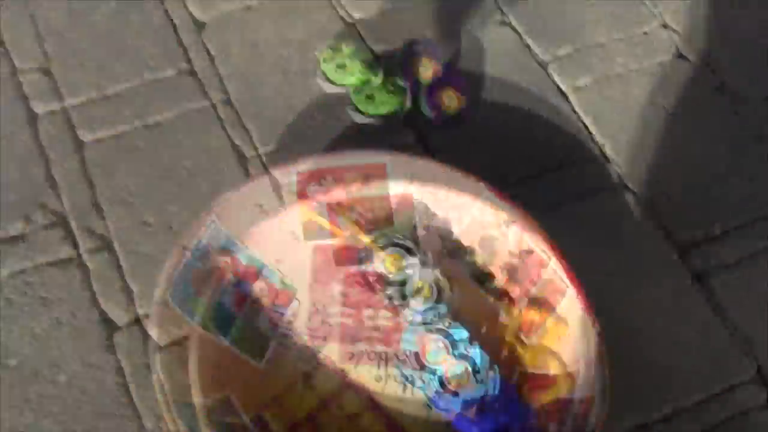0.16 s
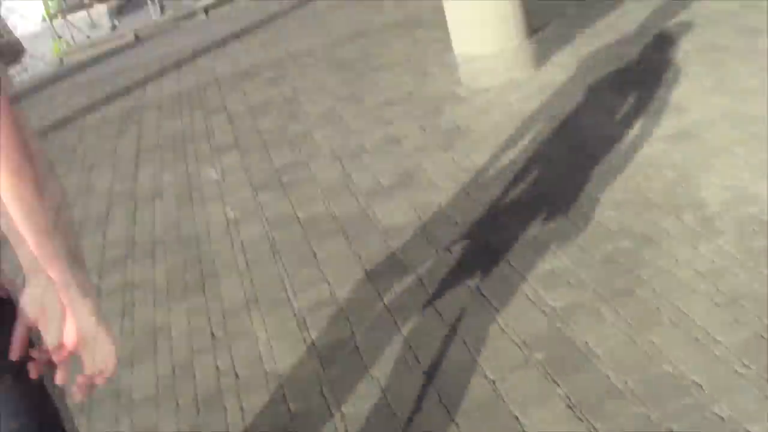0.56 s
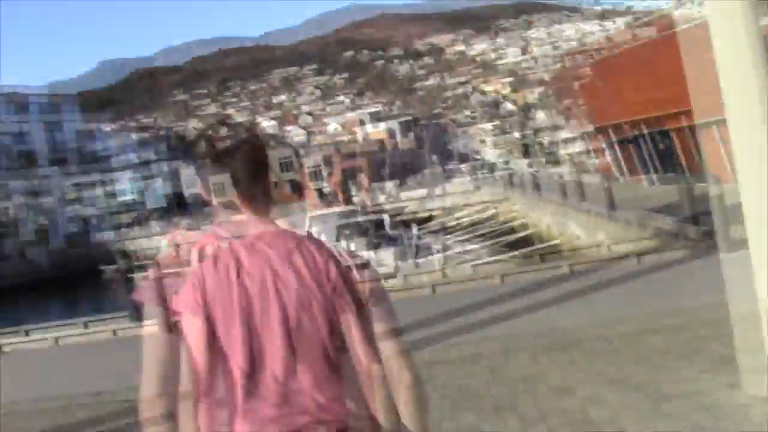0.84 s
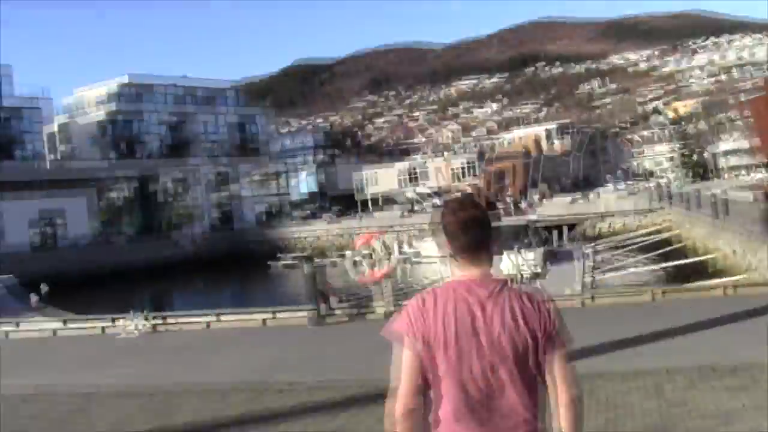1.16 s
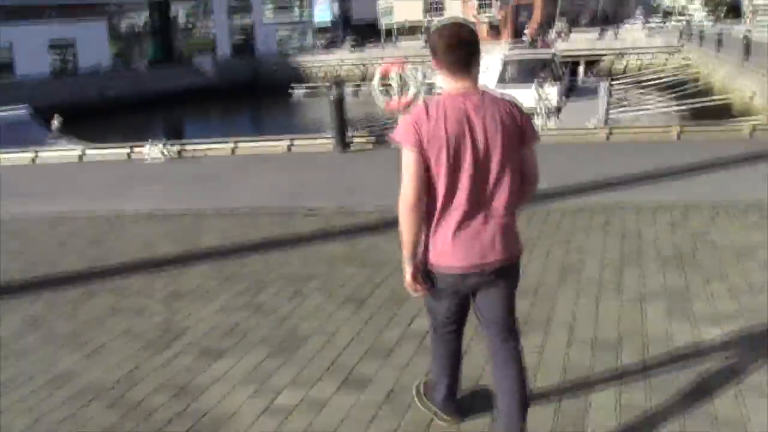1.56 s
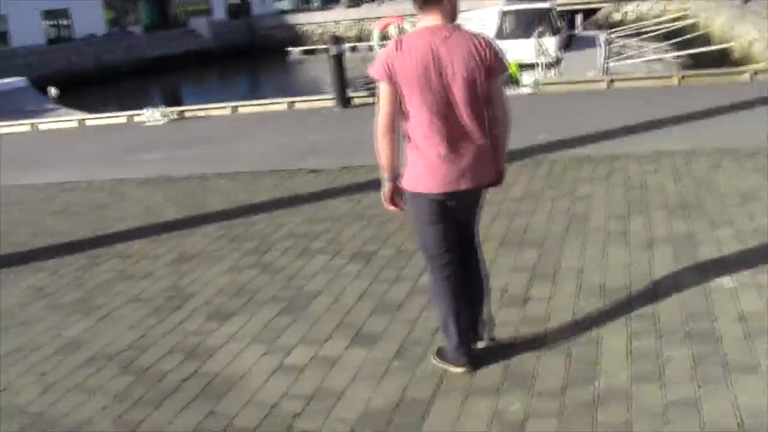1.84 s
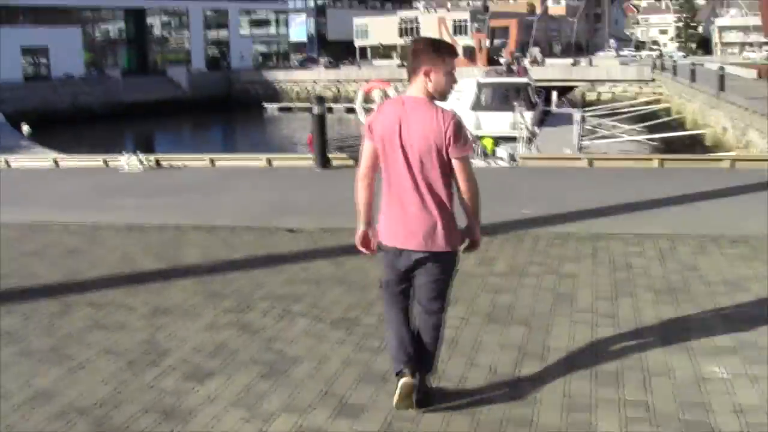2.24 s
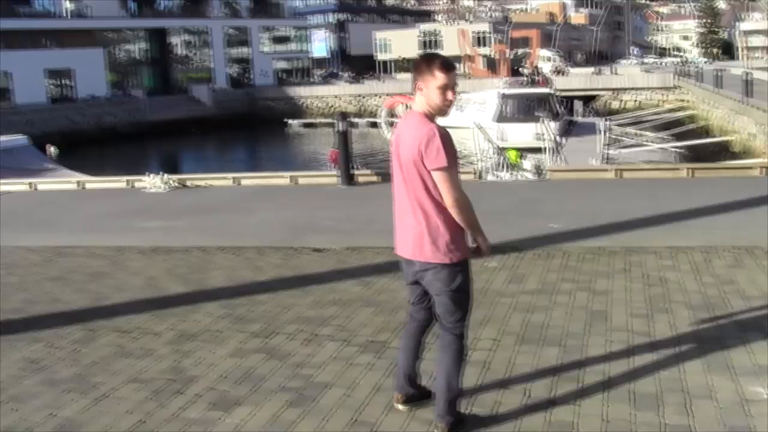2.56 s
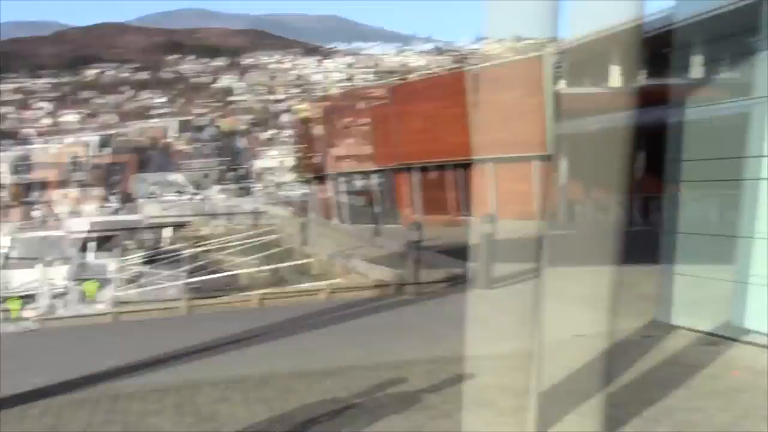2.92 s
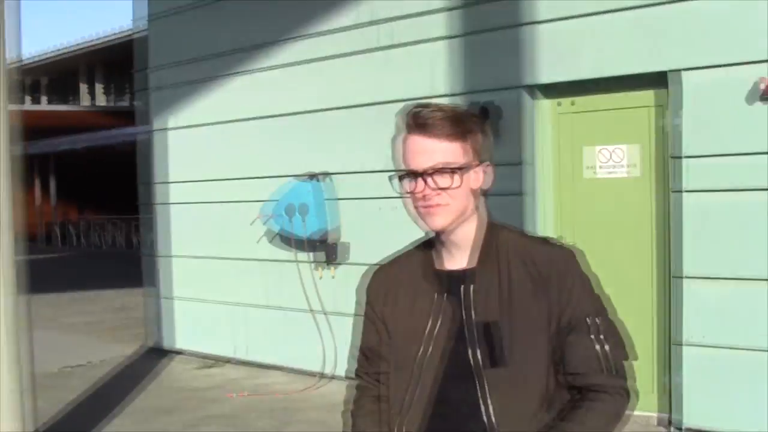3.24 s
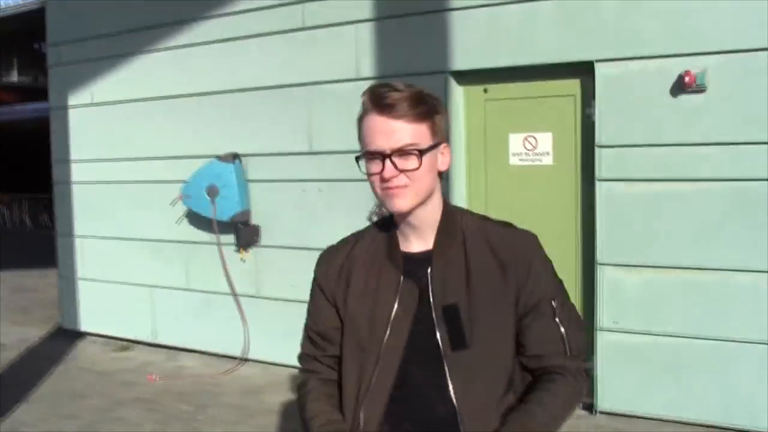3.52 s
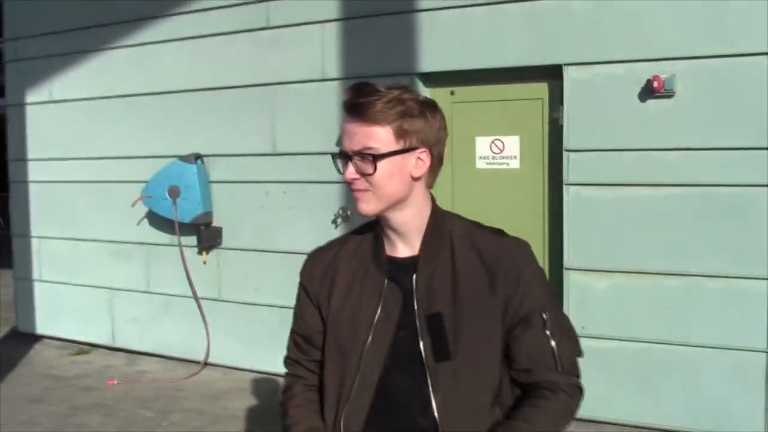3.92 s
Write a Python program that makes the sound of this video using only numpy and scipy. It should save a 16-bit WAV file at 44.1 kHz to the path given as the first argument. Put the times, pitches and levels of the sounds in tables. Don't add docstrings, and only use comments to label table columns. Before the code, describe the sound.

Bright metal-on-plastic rattle of battling tops, a burst of wind and handling taps, a near-silent pause, then farther knocks and rolling.

```python
import sys
import numpy as np
from scipy import signal
from scipy.fft import rfft, irfft, next_fast_len
from scipy.io import wavfile
from scipy.ndimage import uniform_filter1d, map_coordinates

SR = 44100
rng = np.random.default_rng(int(sys.argv[2]) if len(sys.argv) > 2 else 0)


def waveform_to_disk(signal):
    frames = np.transpose(np.atleast_2d(signal))
    scaled = np.clip(frames, -1, 1) * 32767
    samples = np.round(scaled).astype(np.int16)
    wavfile.write(sys.argv[1], SR, samples)


def decibels_to_gain(level_db):
    exponent = np.asarray(level_db, float) / 20
    return 10 ** exponent


N = 180192
TIME = np.arange(N) / SR

# pitch_hz, density_db (per Hz)
HUM_SPECTRUM = [(15, -68), (28, -23), (146, -13.5), (456, -7), (1000, -2), (1500, -8.5), (9510, -34),
                (16400, -49.5)]
# time_s, level_db
TOWN_LEVEL = [
    (0, -32.5),
    (.11, -38.5),
    (.39, -35),
    (.49, -40.5),
    (.95, -40),
    (1.11, -42.5),
    (1.5, -46.5),
    (2.56, -45.5),
    (3.3, -47),
    (4.09, -44.5),
]
TOWN_QUIET_DB, HISS_DB, HISS_GROWS, HISS_FADE_DB_PER_S = -48, -58.5, 1.35, 1.57

# pitch_hz, side_db (re mid)
PORT_WIDTH = [(300, -62.5), (2400, -27), (4400, -12.5), (8000, -7), (15000, 7.5)]
# pitch_hz, t60_s
YARD_DECAY = [(300, 0.33), (2000, 0.029), (10000, 0.039)]

# time_s, level_db
WIND_LEVEL = [
    (0, -67),
    (.214, -47),
    (.364, -38.5),
    (.668, -43),
    (.764, -37),
    (.908, -31.5),
    (.99, -33),
    (1.17, -41),
]
# pitch_hz, density_db (per Hz)
BUFFET_SPECTRUM = [(15, -57), (25, -8.5), (75, -5), (177, 0), (245, -7), (340, -8), (1400, -26.5),
                   (2640, -120)]
# pitch_hz, correlation (0 to 1)
WIND_LIKENESS = [(80, 0.8), (150, 0.2), (300, 0.14), (1000, 0.091)]
# start_s, peak_db, pitch_hz, length_cycles, left_right_db
FLUTTERS = [(0.294, -26.5, 274, 1.5, 3), (0.416, -24.5, 198, 2.2, 0), (.745, -33, 89.5, 2.6, 3),
            (0.801, -27.5, 98, 1.9, -9), (.818, -27, 190, 2.2, -3), (.864, -20, 176, 3.2, 4),
            (.866, -27, 96, 5.4, -4), (0.886, -24, 255, 4.1, 1), (.903, -25, 88, 3.2, -2),
            (.933, -22, 175, 1.6, -8), (.98, -27, 203, 2.3, -3), (1.003, -25, 156, 3, 10),
            (1.049, -31, 95, 3.1, 6), (1.102, -30, 179, 2.9, 9), (1.109, -32.5, 67, 2.8, 5)]
# time_s, peak_db, width_ms, direction (sign)
PRESSURE_SLAPS = [(.8135, -24, 1, 1), (0.826, -19, 0.92, 1), (0.8696, -17, 1.1, -1), (0.881, -14, 1.1, 1),
                  (0.893, -14, 0.64, 1), (0.9043, -14, 1, -1), (0.937, -14, 1.1, 1), (0.942, -16, 0.66, 1),
                  (.949, -23, 0.89, -1), (.977, -22, 0.8, -1), (1.0153, -19, 1, 1), (1.118, -21, 0.62, 1),
                  (1.125, -24, 1.3, 1)]
WIND_CUT_S = 1.168
SHARED_BASS_HZ = 70
SETTLE_DB, SETTLE_S = -50.5, 0.26

# start_s, peak_db, ring_hz, thud_db
# (re peak), t60_s
TAPS_AND_CLICKS = [(0.252, -9.5, 760, -4, 0.036), (0.3823, -13, 1210, 3, 0.011), (0.398, -1, 2000, -15, 0.0053),
                   (0.736, 8, 940, -19.5, 0.0029), (0.748, 5, 1020, -23, 0.0038), (0.768, -12, 820, -25, 0.012),
                   (0.857, -30, 3500, -22, .006), (0.912, -24.5, 3100, -25, 0.006),
                   (0.937, -20, 2410, -20, 0.0054), (0.9716, -6, 1900, -11.5, 0.0062),
                   (1.012, -18, 3200, -20, 0.0033), (2.4644, -5, 1860, -28, 0.012),
                   (2.9134, -11.5, 2130, -39, 0.0042), (2.9769, -15.5, 2050, -44, 0.0066),
                   (3.392, -10.5, 1260, -20.5, 0.0044), (3.685, -23, 1730, -10, 0.0082)]
# start_s, rise_s, fall_s, level_db
SOLE_SCUFFS = [
    (0.462, 0.042, 0.01, -28),
    (0.64, 0.023, 0.011, -41.5),
    (0.899, 0.038, 0.27, -49.5),
    (1.038, 0.012, 0.022, -46),
    (1.4, 0.017, 0.16, -52),
    (1.601, 0.023, 0.074, -53.5),
    (1.729, 0.012, 0.35, -53.5),
    (3.339, 0.026, 0.09, -46.5),
    (3.463, 0.015, 0.034, -52.5),
    (3.91, 0.016, 0.07, -44),
]
# start_s, fall_s, level_db, tilt_db (per octave)
QUICK_RUBS = [(0.05, 0.015, -21.5, -1.5), (0.064, 0.011, -20.5, 2), (0.133, 0.006, -18, -1.5),
              (0.183, 0.009, -17.5, -2), (0.225, 0.015, -16, -1.5), (0.728, 0.066, -39.5, -0.5),
              (1.051, 0.0051, -53, 0), (1.297, 0.0015, -46.5, 3.5), (2.189, 0.082, -37.5, -8.5),
              (2.452, 0.0055, -63, -31), (2.719, 0.018, -35.5, -7), (2.776, 0.0041, -48, -1),
              (3.682, 0.0061, -57.5, 4)]
RUB_RISE_S, SCUFF_TILT_DB = 0.0056, -6.5

# start_s, level_db
LOW_THUDS = [
    (0.202, -23),
    (.214, -23),
    (.224, -19.5),
    (.306, -27.5),
    (.384, -23),
]
# time_s, level_db
RASP_LEVEL = [(2.07, -71), (2.12, -49), (2.21, -50), (2.3, -51), (2.42, -55), (2.5, -65), (2.7, -72),
              (2.83, -45), (2.95, -67), (3.33, -85), (3.365, -53), (3.39, -75)]
RASP_HZ, RASP_WIDTH_HZ = 3500, 520

# time_s, level_db
ROLL_PRESSURE = [
    [(0, -28), (.098, -45.5), (.26, -31.5), (.374, -61), (.46, -53)],
    [(2.05, -59), (2.136, -42.5), (2.256, -40.5), (2.42, -43), (2.556, -37), (2.704, -47), (2.804, -41),
     (2.934, -41.5), (3.05, -76)],
]
# pitch_hz, level_db, t60_s
DRONE_MODES = [(1040, -13, 0.021), (1143, 4, 0.037), (1190, -5.5, 0.027), (1563, -1, 0.053),
               (1710, -2, 0.03), (2070, -6, 0.028)]
ROLL_MID_DB, DRONE_DB, RATTLE_DB, RATTLE_GROWS, WHIRR_DB, WHIRR_GROWS = -39.5, -40, -54, 0.78, -52.5, 1.7

# start_s, peak_db,
# pitch_hz
SQUARE_BLOWS = [(0.036, -21, 2130), (0.0482, -12, 2830), (.0962, -1.5, 1870), (0.126, -19, 1400),
                (0.1755, -19, 1310), (.2078, -15, 2220), (.2168, -7.5, 2230), (0.235, -8, 3630),
                (.2402, -12, 1670), (.3066, -14.5, 2210), (.9716, -17, 1640), (2.085, -31, 1590),
                (2.1272, -27, 1300), (2.148, -33, 1410), (2.1625, -37, 1300), (2.1934, -34, 1600),
                (2.208, -32, 1580), (2.316, -23.5, 1260), (2.464, -15.5, 1894), (2.5094, -21, 1510),
                (2.5376, -18, 1450), (2.567, -19, 1400), (2.7695, -18, 1490), (2.8095, -20, 2280),
                (2.913, -30, 2370), (2.978, -32.5, 2500)]
CLACK_T60_S, CLACK_SPREAD_OCT, CLACK_RISE_S = 0.015, 0.32, 0.00024

# pitch_hz, level_db, t60_s
FAR_RIM_MODES = [(2070, 9, 0.014), (2320, -4, 0.0307), (1950, -3.5, 0.012), (3160, -0.5, 0.029),
                 (3500, -3, 0.015), (3700, -10, 0.014), (4050, -10, 0.02), (4320, 1.5, 0.0059),
                 (9500, 10, 0.0025)]
# pitch_hz, level_db, t60_s
NEAR_RIM_MODES = [(2070, 3, 0.025), (2070, -4.5, 0.041), (2350, -4.5, 0.021), (2630, -3, 0.024),
                  (2810, 3, 0.015), (2960, 9.5, 0.011), (3300, 5.5, 0.015), (3680, 9, 0.017),
                  (4050, 1.5, 0.028), (4450, -4, 0.0095), (4660, 3, .015)]
# pitch_hz, level_db, t60_s
FAR_FLOOR_MODES = [(726, -10.5, 0.019), (1032, 6.5, 0.026), (1120, -1, 0.096)]
# pitch_hz, level_db, t60_s
NEAR_FLOOR_MODES = [(745, -5.5, 0.032), (806, -1, 0.0256), (954, 8.5, 0.03), (1074, 9, 0.0307),
                    (1120, -6.5, 0.02), (1150, -13.5, 0.025)]
# pitch_hz, level_db, t60_s
WALL_MODES = [(1440, -16, 0.027), (1544, 10, 0.037), (1593, -3.5, 0.035), (1784, -5.5, 0.019)]
# pitch_hz, level_db
TICK_SPECTRUM = [(3000, 14.5), (5000, 4.5), (6200, 7.5), (9000, -1.5), (11000, -6), (13000, -47),
                 (15500, -27.5)]
# start_s, tick_db, rim_db, rim_hz (strongest mode), tick_hz (brightest metal)
NEAR_CLASHES = [(.0008, -15.5, -22.5, 2126, 6000), (.0361, 1, -5, 1990, 8500),
                (.0372, -24.5, 1, 2750, 6000), (.0483, -12.5, -2.5, 2930, 8060),
                (.0551, -13.5, -31.5, 2670, 9000), (.0647, -10.5, -35.5, 3190, 9500),
                (.0712, -29, -9.5, 2974, 5460), (.0865, -23.5, -31, 2000, 8010),
                (.0958, -2.5, -8.5, 2050, 7000), (.1157, -27, -27, 3700, 7970),
                (.1268, -10.5, -11.5, 3700, 9180), (.1355, -23, -19.5, 4450, 8000),
                (.1495, -13, -19.5, 3700, 8030), (.1587, -9.5, -22.5, 3330, 9100),
                (.1722, -24.5, -20, 1980, 5000), (.1773, -9.5, -9.5, 2920, 7530),
                (.1845, -12, -32.5, 3300, 9930), (.1875, -26, -20.5, 4050, 9500),
                (.1998, -24, -27, 2000, 8460), (.2043, -15.5, -30.5, 2000, 9920),
                (.2074, -4.5, -8.5, 1995, 7570), (.2163, -7.5, -10.5, 2950, 9500),
                (.2234, -18, -15, 2097, 10000), (.2273, -4, -18, 2250, 8050), (.2355, -9, -10, 4660, 7500),
                (.2403, -15.5, -9.5, 3620, 7000), (.2465, -13.5, -19.5, 2890, 9060),
                (.2525, -52.5, -33, 3690, 8120), (.2658, -13.5, -33, 2300, 10000),
                (.2874, -21.5, -23, 2070, 5500), (.2998, -18, -40.5, 2070, 9040),
                (.3063, 0.5, -14.5, 4050, 6490), (.3205, -26.5, -25, 2070, 7500),
                (.3335, -37.5, -23, 2070, 7000), (.3478, -30, -30, 4050, 7000),
                (.3686, -23, -22.5, 4050, 7000), (.3835, -24, -22, 4050, 6000),
                (.4105, -18.5, -30, 2000, 8500)]
# start_s, tick_db, rim_db, rim_hz (strongest mode), tick_hz (brightest metal)
FAR_CLASHES = [(2.082, -24, -26.5, 3300, 6130), (2.0998, -25.5, -34, 3500, 8100),
               (2.1263, -28, -32, 3500, 7000), (2.131, -32.5, -35, 3500, 6000),
               (2.1469, -33, -32, 3470, 6000), (2.1621, -19.5, -29, 3500, 9500),
               (2.193, -24.5, -44, 3500, 6360), (2.2065, -25, -28, 3620, 7000),
               (2.2398, -30, -33, 3580, 6440), (2.2455, -35, -31, 3600, 6000),
               (2.2555, -35, -37, 3500, 6500), (2.2998, -38, -45, 3500, 6000),
               (2.316, -28, -24, 3030, 7500), (2.3487, -25.5, -34, 3600, 9500),
               (2.3605, -39, -36, 3600, 6000), (2.367, -36, -38, 2070, 8000), (2.436, -51, -46, 3500, 9000),
               (2.4509, -24.5, -29, 3500, 6270), (2.464, -17.5, -15, 2070, 6000),
               (2.4735, -32.5, -48, 2070, 8000), (2.4927, -34, -27, 2070, 7000),
               (2.5088, -17.5, -20.5, 4400, 7300), (2.5377, -36, -35, 2070, 6000),
               (2.5651, -31, -27, 3160, 7000), (2.5825, -37.5, -30.5, 3160, 7000),
               (2.6221, -34, -30.5, 2070, 5970), (2.7089, -29, -32, 2350, 7860),
               (2.7179, -20, -25.5, 3160, 7700), (2.7296, -25, -25, 2320, 7000),
               (2.7584, -32, -25.5, 2320, 7000), (2.7698, -34, -23, 2320, 7000),
               (2.79, -31.5, -26, 3160, 7000), (2.8098, -27, -13.5, 4300, 7000),
               (2.812, -40, -21.5, 3160, 7000), (2.8287, -29.5, -25, 2320, 7900),
               (2.842, -39, -28, 2320, 7000), (2.8906, -27.5, -30.5, 3600, 7000),
               (2.9128, -43, -36, 3600, 7000), (2.978, -31.5, -30, 9500, 9500)]
# start_s, floor_db, wall_db, floor_hz (pitch at the spot)
NEAR_KNOCKS = [(.0038, -27, -24.5, 1110), (0.012, -31, -44.5, 1110), (0.0357, -14, -9.5, 827),
               (0.0481, -12.5, -34, 830), (0.0647, -21, -14.5, 1040), (0.071, -40.5, -12, 1040),
               (0.087, -25, -18.5, 1040), (0.0964, -12, -5.5, 1010), (0.116, -51, -53.5, 1040),
               (0.1278, -12.5, -12.5, 813), (0.1367, -36, -18.5, 900), (0.139, -36.5, -18, 900),
               (0.17, -32, -35.5, 900), (0.177, -9.5, -11.5, 913), (0.1858, -28, -13.5, 903),
               (0.1982, -11.5, -22, 900), (0.2037, -31.5, -22, 1100), (0.2073, -15, -15, 1097),
               (0.217, -21.5, -19, 1115), (0.2236, -16.5, -34, 1102), (0.228, -25.5, -32, 1120),
               (0.237, -9, -13.5, 1050), (0.241, -13, -12.5, 769), (.254, -35, -32, 767),
               (0.288, -40.5, -23, 1040), (0.3065, -14.5, -18, 745), (0.321, -32, -29, 830),
               (0.332, -41, -27, 1040), (0.348, -45, -24.5, 1040), (0.371, -45, -36, 1040),
               (0.409, -40, -32, 1040), (0.588, -40, -27, 1180)]
# start_s, floor_db, wall_db
FAR_KNOCKS = [(2.085, -46.5, -29.5), (2.1267, -25.5, -45), (2.205, -44, -29.5), (2.257, -43, -49),
              (2.2956, -50, -52), (2.3156, -34, -39), (2.348, -34, -31), (2.367, -22.5, -18.5),
              (2.464, -33, -15), (2.503, -24, -36), (2.509, -15.5, -14.5), (2.537, -17, -25),
              (2.549, -21.5, -49), (2.5654, -17, -25), (2.579, -17.5, -21), (2.6224, -26.5, -41),
              (2.709, -28.5, -30), (2.7307, -37, -49), (2.7698, -52, -10), (2.7774, -20, -38),
              (2.791, -31, -18), (2.809, -19, -16), (2.817, -47, -23), (2.831, -21.5, -33),
              (2.841, -29, -21.5), (2.8566, -26, -24), (2.8736, -28, -27), (2.913, -38, -39),
              (2.9785, -35, -35)]
FAR_FLOOR_HZ = 1110
KNOCK_RIM_DB, KNOCK_TICK_DB, KNOCK_RIM_HZ, KNOCK_TICK_HZ = -18, -21.5, 2050, 7000
RIM_FOCUS_DB, FLOOR_FOCUS_DB, TICK_FOCUS_DB = 14, 41.5, 16.5
RIM_RISE_S, BOWL_RISE_S = 0.0002, 0.00045
NEAR_SPREAD_DB = -17.5
CHANCE_DB, STEADY_DB = 2.5, 0.5


def unit(x):
    return x / np.sqrt(np.mean(x ** 2) + 1e-20)


def along(points, hz):
    point_hz, value = np.transpose(points)
    return np.interp(np.log(hz + 1), np.log(point_hz + 1), value)


def curve(rows):
    return np.interp(TIME, *np.transpose(rows), -120, -120)


def wobble(rate):
    return map_coordinates(rng.standard_normal(int(N * rate / SR) + 4), [TIME * rate])


def filtered(x, response):
    size = next_fast_len(N + SR // 4)
    return irfft(rfft(x, size) * response(np.fft.rfftfreq(size, 1 / SR)), size)[..., :N]


def band(x, lo_hz, hi_hz):
    sos = signal.butter(3, [lo_hz, min(hi_hz, SR * .45)], "band", fs=SR, output="sos")
    return signal.sosfilt(sos, x)


def add(track, s, sound):
    part = track[..., max(round(s * SR), 0):][..., :sound.shape[-1]]
    part += sound[..., :part.shape[-1]]


def ringing(modes, t, spread_db, drift=0.0077):
    hz, db, t60 = np.transpose(modes)[..., None]
    luck = rng.standard_normal((2, len(modes), 1))
    decay = decibels_to_gain(db + spread_db * luck[0] - 60 * t / np.abs(t60))
    return np.sum(decay * np.sin(2 * np.pi * hz * (1 + drift * luck[1]) * t), axis=0)


def focus(modes, spot_hz, loss_db):
    return [(hz, db - loss_db * abs(np.log2(hz / spot_hz)), t60) for hz, db, t60 in modes]


def ports(mid, other):
    side = filtered(other, lambda hz: decibels_to_gain(along(PORT_WIDTH, hz)))
    return np.array([mid + side, mid - side])


def yard(x):
    hz, t, z = signal.stft(rng.standard_normal(SR // 3), SR, nperseg=256)
    decay = decibels_to_gain(-60 * t / along(YARD_DECAY, hz)[:, None])
    tail = signal.istft(z * decay, SR, nperseg=256)[1]
    delayed = np.pad(x, ((0, 0), (200, 0)))
    return signal.fftconvolve(delayed, tail[None] / np.linalg.norm(tail), axes=1)[:, :N]


def town():
    z = signal.stft(rng.standard_normal((2, N)), nperseg=512)[2]
    field = uniform_filter1d(rng.standard_normal(z.shape[1:]), 6, 0)
    field = uniform_filter1d(field, 14, 1)
    patchy = signal.istft(z * decibels_to_gain(1.8 * unit(field)), nperseg=512)[1][:, :N]

    def high(hz):
        return hz ** 4 / (hz ** 4 + 2600 ** 4)

    def traffic_colour(hz):
        return decibels_to_gain(along(HUM_SPECTRUM, hz)) * hz ** 3 / (hz ** 3 + 75 ** 3) * np.sqrt(1 - high(hz))

    traffic = filtered(patchy, traffic_colour)
    hiss = filtered(rng.standard_normal((2, N)),
                    lambda hz: decibels_to_gain(along(HUM_SPECTRUM, hz)) * np.sqrt(high(hz)))
    level_db = curve(TOWN_LEVEL)
    hiss_db = HISS_DB + HISS_GROWS * (level_db - TOWN_QUIET_DB) - HISS_FADE_DB_PER_S * TIME
    return decibels_to_gain(level_db + wobble(10.0) / 2) * unit(traffic) + decibels_to_gain(hiss_db) * unit(hiss)


def settling():
    since = TIME - WIND_CUT_S
    return decibels_to_gain(SETTLE_DB) * np.clip(since / .004, 0, 1) * np.exp(-np.abs(since) / SETTLE_S)


def flutter(hz, cycles, pan_db):
    t = np.arange(SR // 16) / SR
    swell = np.sin(np.pi * np.clip(t * hz / cycles, 0, 1)) ** 0.38
    waver = 1 + 0.14 * np.sin(2 * np.pi * (24 * t + rng.random())) + 0.033 * rng.standard_normal((2, 1))
    lag_cycles = [[0], [0.06 * rng.random()]]
    phase = 2 * np.pi * (hz * np.cumsum(waver, axis=1) / SR + lag_cycles)
    pan = decibels_to_gain(np.array([[pan_db / 2], [-pan_db / 2]]))
    return pan * np.abs(swell) * (np.sin(phase) + 0.15 * np.sin(2 * phase + 1))


def wind():
    lumps = decibels_to_gain(0.33 * wobble(30) + 2.0 * np.array([wobble(59.04), wobble(55)]))

    def colour(hz):
        turn = np.arccos(np.clip(along(WIND_LIKENESS, hz), -1, 1)) / 2
        return decibels_to_gain(along(BUFFET_SPECTRUM, hz)) * [np.cos(turn), np.sin(turn)]

    mid, side = filtered(lumps * rng.standard_normal((2, N)), colour)
    out = decibels_to_gain(1.0 + curve(WIND_LEVEL)) * unit(np.array([mid + side, mid - side]))
    for s, db, hz, cycles, pan_db in FLUTTERS:
        add(out, s, decibels_to_gain(db) * flutter(hz, cycles, pan_db))
    mid = (out[0] + out[1]) / 2
    side = filtered(out[0] - out[1], lambda hz: hz * hz / (hz * hz + SHARED_BASS_HZ ** 2)) / 2
    closing = np.clip((WIND_CUT_S - TIME) / 0.0024, 0, 1)
    return band(np.array([mid + side, mid - side]), 38, 3290) * closing


def slaps():
    s, db, ms, way = np.transpose(PRESSURE_SLAPS)[..., None]
    u = (TIME[:SR * 2] - s) / (ms / 1000)
    swing = np.sqrt(np.e) * u * np.exp(-u * u / 2)
    side = np.sum(-np.sign(way) * decibels_to_gain(db) * swing, axis=0)
    return band(np.pad(side, (0, N - len(side))), SHARED_BASS_HZ, 3290) * [[1], [-1]]


def taps():
    out, t = np.zeros(N), np.arange(SR // 20) / SR
    for s, db, hz, thud_db, t60 in TAPS_AND_CLICKS:
        snap_decay = decibels_to_gain(-60 * t / (0.4 * t60)) + decibels_to_gain(10.5 - 60 * t / 0.058)
        snap = band(rng.standard_normal(len(t)) * snap_decay, 620, 4160)
        ring = ringing([(hz, 0, t60), (2300, -5, .003)], t, STEADY_DB)
        ring = ring - ringing([(1570, 10.5, 0.00086), (3100, -14.0, 0.0038)], t, STEADY_DB)
        ring = ring * (1 - np.exp(-t / 0.0011))
        click = ring / np.abs(ring).max() + 0.13 * snap / np.abs(snap).max()
        thud = ringing([(353.0, 0.8, 0.0065), (502, -2.0, 0.017)], t, STEADY_DB)
        add(out, s, decibels_to_gain(db - 11.5) * (click + decibels_to_gain(thud_db + 9.0) * thud))
    return band(out, 227, 8950)


def scuffs():
    out, t, hz = np.zeros((2, N)), np.arange(SR // 4) / SR, np.fft.rfftfreq(SR // 4, 1 / SR)
    rows = [(s, RUB_RISE_S, *rest) for s, *rest in QUICK_RUBS]
    rows += [(*row, SCUFF_TILT_DB) for row in SOLE_SCUFFS]
    for start, rise, fall, db, tilt_db in rows:
        grains = rng.standard_normal((2, len(t))) * decibels_to_gain(2.0 * rng.standard_normal(len(t)))
        colour = decibels_to_gain(tilt_db * np.log2(hz / 4000 + 0.015))
        colour = colour * hz ** 2 / (hz ** 2 + 1500 ** 2) / (1 + (hz / 11500) ** 8)
        sand = unit(irfft(rfft(grains) * colour, len(t)))
        times = [0, rise, rise + fall, rise + 1.2 * fall]
        swell = np.interp(t, times, [0.0, 0.79, 0.0057, 0.031], 0, 0)
        add(out, start, decibels_to_gain(db) * swell * sand)
    return out * decibels_to_gain([[0], [-9]])


def base():
    out, t = np.zeros(N), np.arange(SR // 10) / SR
    for s, db in LOW_THUDS:
        mode = ringing([(354.0, 0.0064, 0.11)], t, spread_db=2.5)
        add(out, s, decibels_to_gain(db) * (1 - np.exp(-t / 0.0011)) * mode)
    return out


def rasp():
    grains = rng.standard_normal((2, N)) * decibels_to_gain(4.5 * wobble(92) + 4 * wobble(30))

    def resonance(hz):
        damping = 1j * hz * RASP_WIDTH_HZ
        return damping / (RASP_HZ ** 2 - hz ** 2 + damping)

    return decibels_to_gain(curve(RASP_LEVEL)) * unit(filtered(grains, lambda hz: resonance(hz) ** 2))


def rolling():
    t = np.arange(SR // 10) / SR
    body = ringing(DRONE_MODES, t, STEADY_DB, drift=.001)
    body = body + decibels_to_gain(-24.5) * ringing(FAR_RIM_MODES, t, STEADY_DB)
    grains = rng.standard_normal((2, 2, N)) * decibels_to_gain(4 * wobble(300) + 2.5 * wobble(50))

    def rattle_colour(hz):
        return decibels_to_gain(along(TICK_SPECTRUM, hz) - 0.94 * np.log2(hz / 4000 + 0.085)) * (hz > 1800)

    def whirr_colour(hz):
        return decibels_to_gain(along(HUM_SPECTRUM, hz)) * hz ** 2 / (hz ** 2 + 3000 ** 2)

    drone = unit(signal.fftconvolve(grains[0], body[None], axes=1)[:, :N])
    rattle = unit(filtered(grains[1], rattle_colour))
    whirr = unit(filtered(rng.standard_normal((2, N)), whirr_colour))
    press_db = np.maximum(*[curve(rows) for rows in ROLL_PRESSURE]) - ROLL_MID_DB
    return (decibels_to_gain(DRONE_DB + press_db) * drone + decibels_to_gain(RATTLE_DB + RATTLE_GROWS * press_db) * rattle
            + decibels_to_gain(WHIRR_DB + WHIRR_GROWS * press_db) * whirr)


def clacks():
    out, t = np.zeros(N), np.arange(SR // 40) / SR
    for s, db, hz in SQUARE_BLOWS:
        offsets = np.arange(-2, 3) / 2 + rng.standard_normal(5) / 5
        modes = [(hz * 2 ** (CLACK_SPREAD_OCT * u), -3 * abs(u), CLACK_T60_S) for u in offsets]
        sound = ringing(modes, t, STEADY_DB) * (1 - np.exp(-t / CLACK_RISE_S))
        add(out, s, decibels_to_gain(db) * sound / np.abs(sound).max())
    return band(out, 940, 7600)


def metal(t, lo_hz, spot_hz, count):
    hz = lo_hz + (14000 - lo_hz) * rng.random(count)
    modes = np.transpose([hz, along(TICK_SPECTRUM, hz), 25 / hz])
    return ringing(focus(modes, spot_hz, TICK_FOCUS_DB), t, spread_db=CHANCE_DB)


def contacts(clashes, knocks, rim, floor, scrape_t60, rise, sharp, side_db, lo_hz):
    out, t = np.zeros((2, N)), np.arange(SR // 14) / SR
    rows = [(*row, []) for row in clashes]
    for s, floor_db, wall_db, floor_hz in knocks:
        peak_db = max(floor_db, wall_db)
        bowl = [(focus(floor, floor_hz, FLOOR_FOCUS_DB), floor_db, BOWL_RISE_S),
                (WALL_MODES, wall_db, BOWL_RISE_S)]
        rows.append((s, peak_db + KNOCK_TICK_DB, peak_db + KNOCK_RIM_DB, KNOCK_RIM_HZ, KNOCK_TICK_HZ, bowl))
    for s, tick_db, rim_db, rim_hz, tick_hz, bowl in rows:
        grit = rng.standard_normal((2, len(t))) * decibels_to_gain(8.5 * rng.standard_normal(len(t)))
        scrape = grit * decibels_to_gain(-60 * t / scrape_t60) * (1 - np.exp(-t / rise))
        blow = 0.019 * scrape + 4.3 * np.exp(-t / .00005)
        parts = []
        for modes, db, mode_rise in bowl + [(focus(rim, rim_hz, RIM_FOCUS_DB), rim_db, RIM_RISE_S)]:
            ring = ringing(modes, t, CHANCE_DB, drift=0.0045) * (1 - np.exp(-t / mode_rise))
            parts.append((blow, ring, db))
        tick = metal(t[t < .012], lo_hz, tick_hz, count=24)
        parts.append((0.55 * scrape + sharp * blow, tick, tick_db))
        for force, ring, db in parts:
            sound = signal.fftconvolve(force, ring[None], axes=1)[:, :len(t)]
            add(out, s, decibels_to_gain(db) * sound / np.abs(sound).max(axis=1, keepdims=True))
    return out * decibels_to_gain([[0], [side_db]])


def scene():
    near = contacts(NEAR_CLASHES, NEAR_KNOCKS, NEAR_RIM_MODES, NEAR_FLOOR_MODES,
                    scrape_t60=0.011, rise=0.00009, sharp=0.86, side_db=-9.0, lo_hz=4660)
    far_knocks = [(*row, FAR_FLOOR_HZ) for row in FAR_KNOCKS]
    far = contacts(FAR_CLASHES, far_knocks, FAR_RIM_MODES, FAR_FLOOR_MODES,
                   scrape_t60=0.019, rise=0.00045, sharp=0.062, side_db=-0.5, lo_hz=4750)
    tops = band(near + rolling(), 720, 11000) + band(far, 1106, 12000) + rasp()
    airborne = town() + scuffs() + tops + decibels_to_gain(-18.0) * yard(tops)
    spread = decibels_to_gain(NEAR_SPREAD_DB) * band(near[1], 720, 5200) * [[1], [-1]]
    camera = taps() * decibels_to_gain([[.4], [-.4]]) + settling()
    return ports(*airborne) + spread + base() + clacks() + wind() + slaps() + camera


def top_cut(x):
    return signal.sosfilt(signal.butter(12, 16520, fs=SR, output="sos"), x)


def record(dry):
    soft = dry / (1 + np.abs(dry) ** 6) ** (1 / 6)
    mix = filtered(soft, lambda hz: 1 / (1 + (hz / 15600) ** 16))
    return top_cut(mix)


dry = scene()
out = record(dry)
waveform_to_disk(out)
```